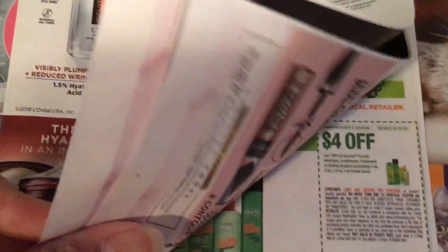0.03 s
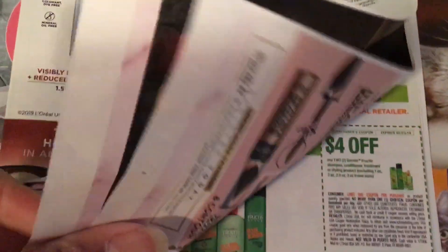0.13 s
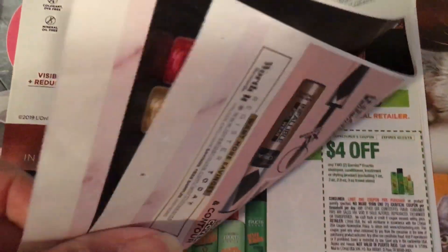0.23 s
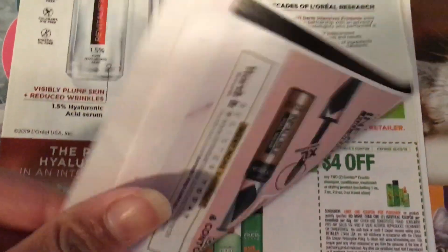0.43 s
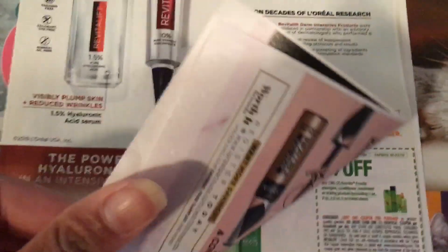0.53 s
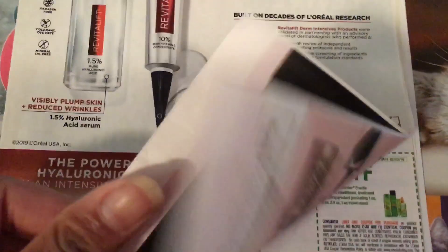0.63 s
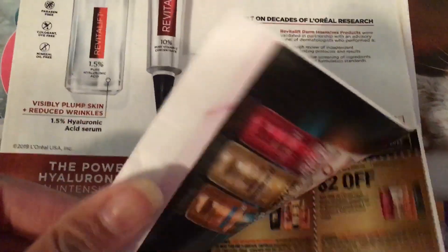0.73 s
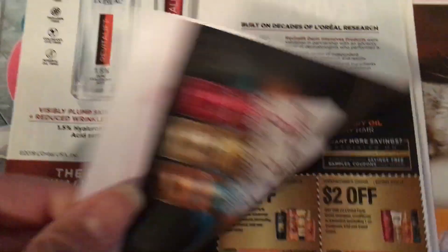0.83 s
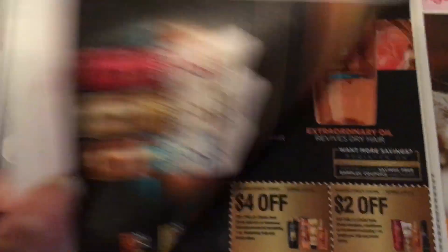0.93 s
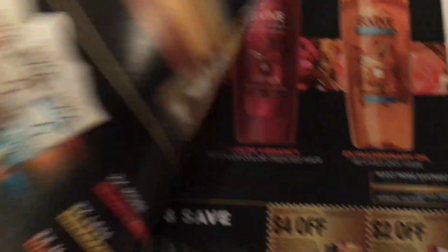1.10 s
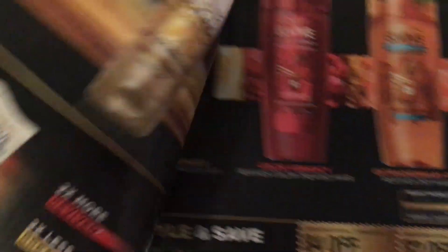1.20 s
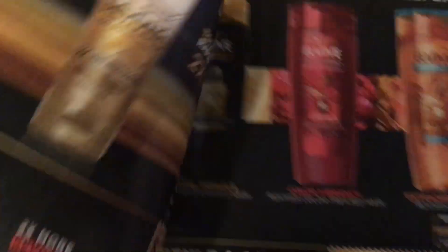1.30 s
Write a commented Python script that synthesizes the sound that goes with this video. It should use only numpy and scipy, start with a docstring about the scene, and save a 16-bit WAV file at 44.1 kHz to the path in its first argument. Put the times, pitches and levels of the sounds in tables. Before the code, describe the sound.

Glossy paper pages being flipped, close and dry, in a small quiet room with faint low rumble. Gritty, uneven rustling runs from the start. A loud bright snap comes at 0.22 seconds, crisp double crackles at 0.43, a tight cluster around 0.69, a lighter tick at 0.86, another strong snap with a soft low puff at 0.97. After 1.05 only fading slides and tiny crinkles remain until about 1.35.

```python
"""A thumb flips through glossy pages close to a phone in a quiet room.
Low room rumble, shaped noise in swaying bands, lies under it all from the start.
Sheets slide over each other with a gritty hiss: noise and random clicks through the sheet's colour.
Creases snap through as bundles of bending waves, treble first; a wall and the room return them.
With some snaps the flexing page pushes air: a low puff that sinks in pitch."""
import sys
import numpy as np
from scipy import signal
from scipy.fft import rfft, irfft
from scipy.io import wavfile
from scipy.ndimage import uniform_filter1d

SR = 44100
rng = np.random.default_rng(int(sys.argv[2]) if len(sys.argv) > 2 else 0)


def int16_out(signal):
    """Quantize to a 16-bit WAV file."""
    q = np.round(np.clip(np.atleast_2d(signal).T, -1, 1) * 32767)
    wavfile.write(sys.argv[1], SR, q.astype(np.int16))


def ratio_of_db(decibels):
    """Turn decibels (scalar or array-like) into linear amplitude factors; 0 dB maps to 1."""
    return 10 ** (np.asarray(decibels, float) / 20)


N = 59535

# room spectrum, relative density: pitch_hz, density_db (per Hz)
ROOM_COLOUR = [(25, -34), (40, -9), (58, 6), (90, -8), (150, -8), (300, -11), (700, -19.5), (2000, -20.5),
               (6000, -62), (16000, -44)]
ROOM_DB, ROOM_SWAY_DB = -58, 3.5  # rms level; spread of each band

# pages sliding, faster is louder, flatter contact brighter: start_s, level_db (relative), brightness_db
SLIDE_PATH = [(0, -42, -1.5), (0.04, -45.5, -6), (0.058, -52, -8), (0.131, -45, -5), (0.155, -46.5, -3.5),
              (0.176, -50, -9.5), (0.204, -41, -2.5), (0.25, -42.5, -9.5), (0.3, -40, -10),
              (0.34, -42.5, -11.5), (0.371, -48.5, -14.5), (0.403, -46, 0.5), (0.447, -36.5, -9),
              (0.498, -48, -2.5), (0.55, -48, -3), (0.587, -42.5, -7.5), (0.6, -48, -17.5), (0.63, -58, -9),
              (0.675, -46, -8), (0.716, -44, -1.5), (0.76, -50.5, -16), (0.795, -62, -11),
              (0.814, -55.5, -7), (0.821, -41, -0.5), (0.835, -42.5, 0), (0.85, -45.5, -1.5),
              (0.9, -44.5, 1), (0.96, -45.5, 1), (1.0, -43, -7.5), (1.05, -46, -4), (1.08, -53.5, -6),
              (1.2, -60, -2), (1.25, -57.5, -8.5), (1.345, -56, -5.5)]
# colour of the sliding, relative density: pitch_hz, density_db (per Hz)
RUB_COLOUR = [(150, -82), (250, -11.5), (533, -15.5), (1060, -6.5), (1560, -3), (2890, -6), (3830, -5.5),
              (4900, -8.5), (5350, -2), (7090, -4), (8760, -2.5), (15100, -8), (15900, -28), (16800, -62)]
# air pockets between the sheets colour the hiss for a moment: middle_s, span_s (to 1/e), pitch_hz, boost_db
AIR_POCKETS = [(0.36, 0.14, 5600, 6.5), (0.57, 0.051, 4300, 7.5), (0.606, 0.2, 8880, 8),
               (0.845, 0.039, 7130, 11), (0.827, 0.02, 9020, 9), (0.84, 0.03, 2180, 6.5),
               (1.254, 0.048, 550, 16), (1.34, 0.017, 5440, 15)]
POCKET_WIDTH_HZ = 720
SWAY_DB, FLICKER_DB = 1.2, 4  # slow wander shared by the bands; quicker wander of each band
GRIT_DB, GRIT_MIX_DB, CRINKLE_MIX_DB = 2, -4, -9.5  # mean click excess; rms against the plain hiss
GRIT_PER_S, CRINKLES_PER_S = 3000, 140
CRINKLE_S, CRINKLE_TOP_HZ = 0.0024, 3300

# creases snapping: start_s, level_db (1.8 times the loudest 1.5 ms rms), strongest_hz,
# treble_db and bass_db (against the strongest part, before the sheet's colour)
CREASE_SNAPS = [(0.046, -39.5, 1470, -10, 12), (.2205, -12, 6400, 5, -33), (.2208, -12.5, 4030, -9, -14),
                (.2255, -44, 1700, -20, 1), (.281, -27, 1670, -15, 3), (0.4313, -18.5, 5760, 6.5, 0),
                (0.4327, -25, 1600, -22, -10), (.4338, -20.5, 3060, -11, -28), (.46, -35, 2230, -10, -24),
                (0.5862, -35, 3940, -15, -3), (.6082, -34.5, 2500, -10, -5), (0.6868, -16, 6000, 8, -25),
                (0.688, -24, 2880, -14, -24), (.6945, -22, 2700, -12, -11), (0.696, -16, 3020, -8, -38),
                (0.6975, -21, 5360, -1.5, -46), (.7008, -28, 2780, -4, 7), (.7415, -39, 2300, -30, -13),
                (0.7718, -37.5, 1790, -14, 1), (0.8626, -21.5, 2460, -16, -33), (.9712, -44, 1860, -5, -28),
                (.9728, -12.5, 6300, 7, -32), (0.9735, -14.5, 2480, -9, -22), (.974, -17.5, 1420, -5.5, -5),
                (1.047, -43.5, 2080, -8, 12), (1.174, -43.5, 1000, -31, -24), (1.2778, -41, 2130, -27, -23),
                (1.278, -40, 532, -34, -2), (1.2797, -45, 4550, -9, -9), (1.2816, -43, 600, -11, -8)]
# what a snapping sheet favours: pitch_hz, gain_db
SHEET_COLOUR = [(150, -9.5), (500, -2), (1400, 8), (2500, 10), (4200, 9.5), (4900, 8.5), (6500, 12.5),
                (8800, 6), (11300, 9.5), (16000, -7.5)]
TREBLE_HZ, BASS_HZ = 8900, 200  # where treble_db and bass_db apply
PLATEAU = 1.14  # the strongest part spans its centre divided and times this
PEAK_DB, PEAK_OCT = 6, .35  # extra hump at the strongest pitch
# bending waves travel slower the lower they are: delay and ring time at 1 kHz and their growth
# towards the bass (the 16 kHz delay is then taken off); the rise is a share of the ring time
LAG_S, LAG_POWER = .0006, .7
RING_S, RING_POWER, RISE_SHARE = .0032, .5, .3
RAGGED_S, SCATTER_CYCLES = .0008, .4  # greatest crack delay; greatest phase scatter

# what follows a snap, in energy against it: crackling sheet, wall echo, room tail
RATTLE_DB, RATTLE_T60_S, RATTLE_TOP_HZ = -15, 0.041, 4800
ECHO_DB, ECHO_S, ECHO_SMEAR_S = -22.5, .013, .001
TAIL_DB, TAIL_T60_S = -19, 0.17

# the whole page flexes and pushes air: start_s, level_db (envelope peak), start_hz, end_hz (approached)
PAGE_THUMPS = [(0.221, -36, 390, 97), (0.278, -41.5, 295, 161), (0.433, -46.5, 258, 111),
               (0.9746, -36.5, 401, 60.5)]
THUMP_FALL_S, THUMP_CYCLES = 0.0055, 0.92  # time constant of the pitch; cycles to the loudest point

MIC_LOW_HZ = 50.7


def colour(table, hz):
    """Spectral envelope: dB of a table at hz, linear in dB over log frequency."""
    table = np.array(table, float)
    return np.interp(np.log(hz), np.log(table[:, 0]), table[:, 1])


def walk(rate):
    """Slow random modulation: levels held 1 / rate s and slewed twice; spread near 1."""
    hold = int(SR / rate)
    steps = np.repeat(rng.standard_normal(N // hold + 1), hold)
    return 0.9 * uniform_filter1d(uniform_filter1d(steps, hold), hold)[:N]


def bands(x, low_hz, count=3):
    """Filter bank: slices of x with soft cosine edges, count to an octave, each with its centre."""
    spectrum = rfft(x)
    octave = np.log2(np.fft.rfftfreq(len(x), 1 / SR) + 1e-9)
    for hz in low_hz * 2 ** np.arange(0, np.log2(18000 / low_hz), 1 / count):
        distance = np.clip(count * (octave - np.log2(hz)), -1, 1)
        yield hz, irfft(spectrum * np.cos(np.pi / 2 * distance) ** 2, len(x))


def room():
    """Background noise of a room: low rumble and faint hiss, each band swaying by itself."""
    out = 0
    for hz, band in bands(rng.standard_normal(N), 21.2):
        out = out + band * ratio_of_db(colour(ROOM_COLOUR, hz) + ROOM_SWAY_DB * walk(9.76))
    return out * ratio_of_db(ROOM_DB) / out.std()


def clicks(per_s):
    """Random impacts: sparse clicks at chance moments, with exponentially spread dB."""
    return (rng.random(N) < per_s / SR) * ratio_of_db(GRIT_DB * rng.exponential(size=N))


def rubbing():
    """Friction noise: smooth hiss, single-sample grit and decaying crinkles of low-passed noise."""
    grit = clicks(GRIT_PER_S) * rng.standard_normal(N)
    decay = np.exp(-1 / (CRINKLE_S * SR))
    crinkle = signal.lfilter([1], [1, -decay], clicks(CRINKLES_PER_S)) * rng.standard_normal(N)
    crinkle = signal.lfilter(*signal.butter(2, CRINKLE_TOP_HZ, fs=SR), crinkle)
    hiss = rng.standard_normal(N)
    return hiss + ratio_of_db(GRIT_MIX_DB) * grit / grit.std() + ratio_of_db(CRINKLE_MIX_DB) * crinkle / crinkle.std()


def pocket_boost(hz, t):
    """Passing resonance: dB that the air pockets add near hz, a bell in pitch and in time."""
    boost = 0
    for middle, span, pocket_hz, db in AIR_POCKETS:
        if abs(hz - pocket_hz) < 3 * POCKET_WIDTH_HZ:
            nearness = np.exp(-((hz - pocket_hz) / POCKET_WIDTH_HZ) ** 2)
            boost = boost + db * nearness * np.exp(-((t - middle) / span) ** 2)
    return boost


def slide():
    """Sliding friction: rubbing noise through the sheet's colour, its level and brightness varying."""
    t, rows = np.arange(N) / SR, np.array(SLIDE_PATH, float)
    level = np.interp(t, rows[:, 0], rows[:, 1])
    bright = np.interp(t, rows[:, 0], rows[:, 2])
    sway, out = [walk(12.0), walk(14.1)], 0
    for hz, band in bands(rubbing(), 157.9, count=5):
        turn = 0.94 * np.log2(hz)  # neighbouring bands sway nearly alike
        wander = SWAY_DB * (np.cos(turn) * sway[0] + np.sin(turn) * sway[1])
        wander = wander + FLICKER_DB * walk(24.91)
        tilt = np.clip(np.log2(hz / 4000) / 0.92, 0, 1) * bright  # none below 4 kHz, full near 7.6 kHz
        out = out + band * ratio_of_db(colour(RUB_COLOUR, hz) + tilt + wander + pocket_boost(hz, t))
    return 2 * out * ratio_of_db(level)


def snap(db, peak_hz, treble_db, bass_db, chance, count=160):
    """Dispersion: quick cracks set off short bending waves; lower ones arrive later and ring longer."""
    t = np.arange(int(.08 * SR)) / SR
    hz = 120 * 137 ** ((np.arange(count) + chance[:count]) / count) ** .8
    khz = hz / 1000
    low_share = np.clip(khz, 0, 1)  # less raggedness and scatter below 1 kHz
    shape = [(BASS_HZ, bass_db), (peak_hz / PLATEAU, 0), (min(peak_hz * PLATEAU, TREBLE_HZ - 1), 0),
             (TREBLE_HZ, treble_db), (2 * TREBLE_HZ, 2 * treble_db)]
    hump = PEAK_DB * np.exp(-(np.log2(hz / peak_hz) / PEAK_OCT) ** 2)
    gain = ratio_of_db(colour(shape, hz) + colour(SHEET_COLOUR, hz) + hump)

    crack = np.floor(4 * chance[count:2 * count] ** 2) / 3  # one of four cracks, 0 to 1
    lag = LAG_S * (khz ** -LAG_POWER - (1 / 16) ** LAG_POWER) + RAGGED_S * crack ** 2 * low_share
    since = np.clip(t - lag[:, None], 0, None)
    age = since / (RING_S * khz[:, None] ** -RING_POWER)
    phase = hz[:, None] * since + (SCATTER_CYCLES * chance[2 * count:] * low_share)[:, None]
    envelope = (1 - np.exp(-age / RISE_SHARE)) * np.exp(-age)
    y = gain @ (envelope * np.sin(2 * np.pi * phase))
    loudest_rms = np.sqrt(uniform_filter1d(y ** 2, size=66).max())
    return y * ratio_of_db(db) / (1.8 * loudest_rms)


def fading(t, t60):
    """Reverberant decay: noise that falls 60 dB in t60 seconds."""
    return np.exp(-np.log(1000) * t / t60) * rng.standard_normal(len(t))


def aftermath():
    """Impulse response after a snap: crackling sheet, smeared wall echo and short room tail."""
    t = np.arange(SR // 3) / SR
    rattle = fading(t, RATTLE_T60_S) * rng.exponential(size=len(t))
    rattle = signal.lfilter(*signal.butter(1, RATTLE_TOP_HZ, fs=SR), rattle)
    late = np.clip(t - ECHO_S, 0, None) / ECHO_SMEAR_S
    echo = late * np.exp(-late) * rng.standard_normal(len(t))
    tail = fading(t, TAIL_T60_S) * (t > ECHO_S / 2)
    parts = [(RATTLE_DB, rattle), (ECHO_DB, echo), (TAIL_DB, tail)]
    return sum(ratio_of_db(db) * part / np.linalg.norm(part) for db, part in parts)


def snaps():
    """Superposition and convolution: every snap, plus the response that follows it."""
    out = np.zeros(N + SR)
    for (at, *row), chance in zip(CREASE_SNAPS, rng.random((len(CREASE_SNAPS), 480))):
        y = snap(*row, chance)
        out[int(at * SR):int(at * SR) + len(y)] += y
    direct = out[:N]
    return direct + signal.fftconvolve(direct, aftermath())[:N]


def thumps():
    """Air displaced by a flexing page: soft low puffs of a few cycles that sink in pitch."""
    t, out = np.arange(N) / SR, 0
    for at, db, start_hz, end_hz in PAGE_THUMPS:
        age = np.clip(t - at, 0, None)
        fallen = THUMP_FALL_S * (1 - np.exp(-age / THUMP_FALL_S))
        cycles = end_hz * age + (start_hz - end_hz) * fallen  # integral of the falling pitch
        swell = cycles / THUMP_CYCLES
        out = out + ratio_of_db(db) * swell * np.exp(1 - swell) * np.sin(2 * np.pi * cycles)
    return out


def scene():
    """Superposition at one microphone: room, sliding, snaps and thumps."""
    return (room() + slide() + snaps() + thumps())[None]


def top_cut(x):
    """Nothing passes above the cut-off."""
    return signal.sosfilt(signal.butter(12, 16960, fs=SR, output="sos"), x)


def record(dry):
    """High-pass response: the phone's microphone drops the deepest bass."""
    mic = signal.butter(2, MIC_LOW_HZ, "high", fs=SR, output="sos")
    mix = signal.sosfilt(mic, dry)
    return top_cut(mix)


dry = scene()
out = record(dry)
int16_out(out)
```